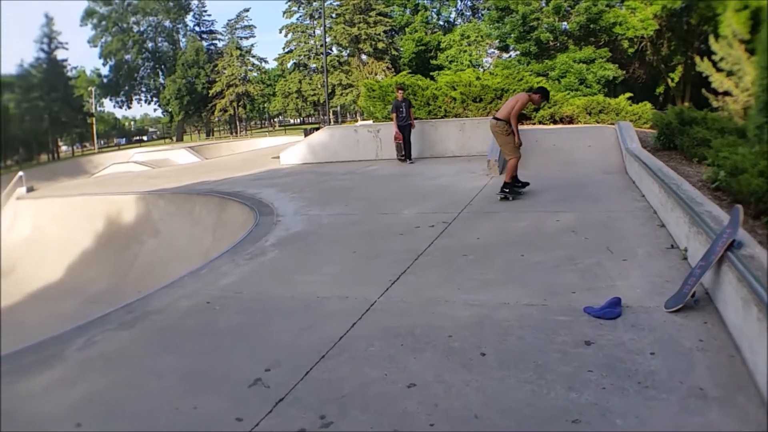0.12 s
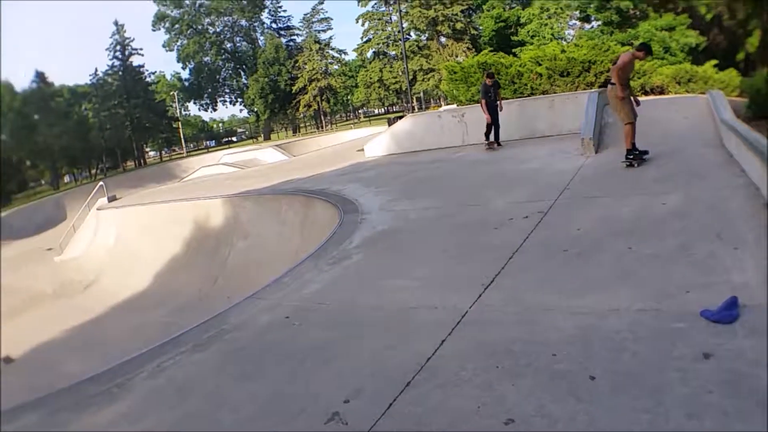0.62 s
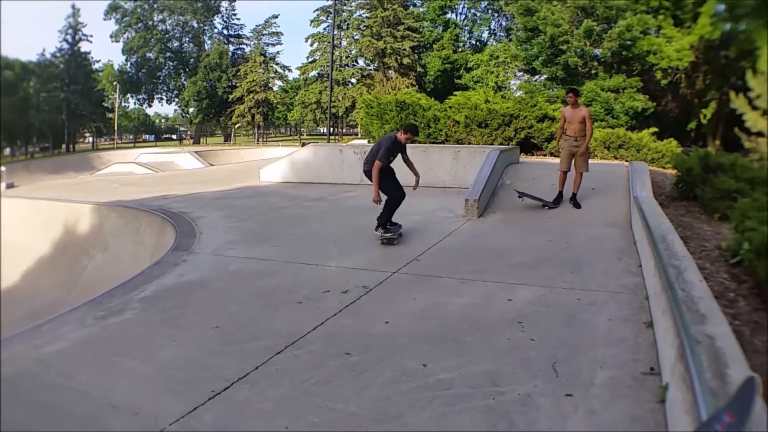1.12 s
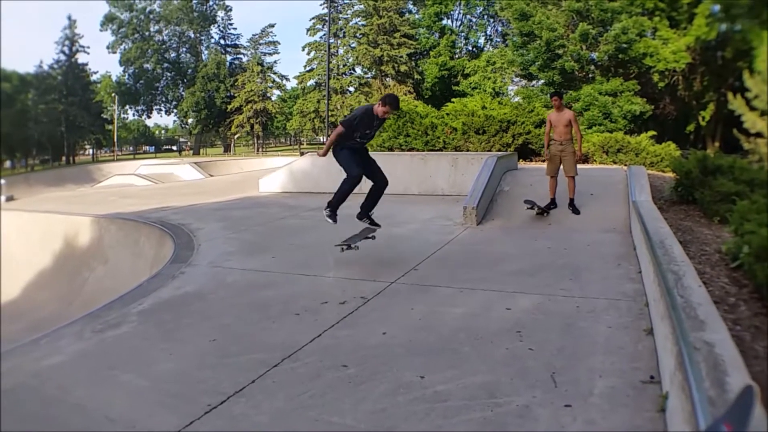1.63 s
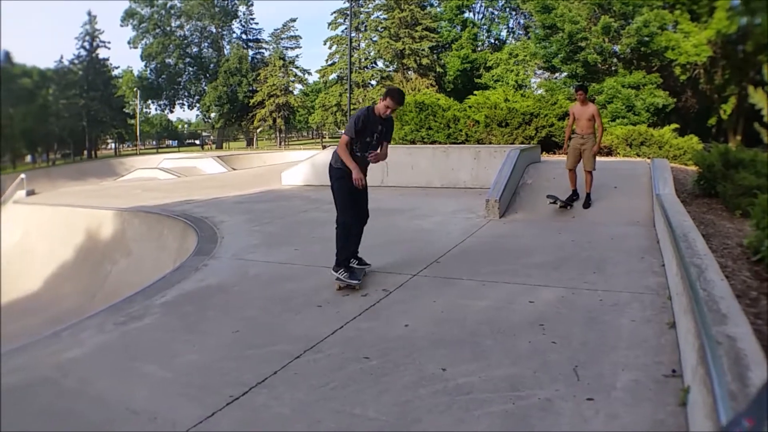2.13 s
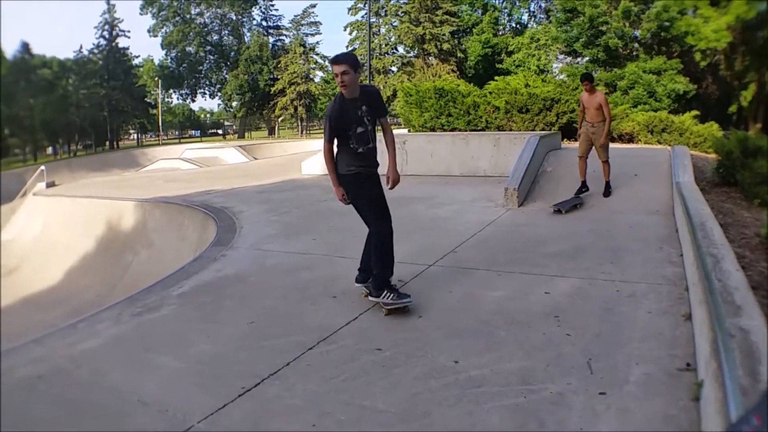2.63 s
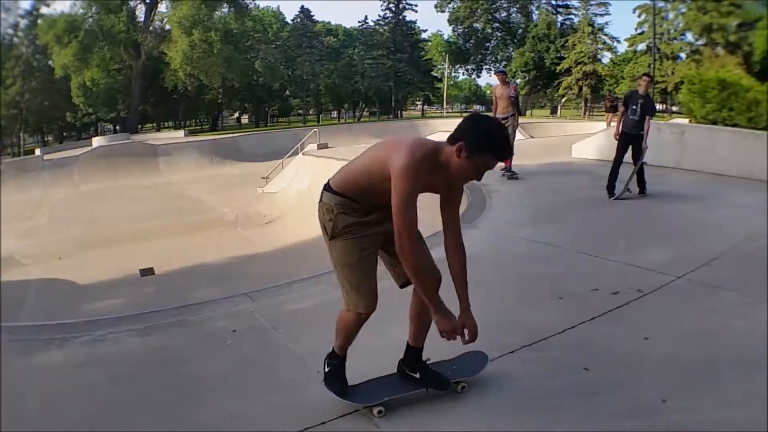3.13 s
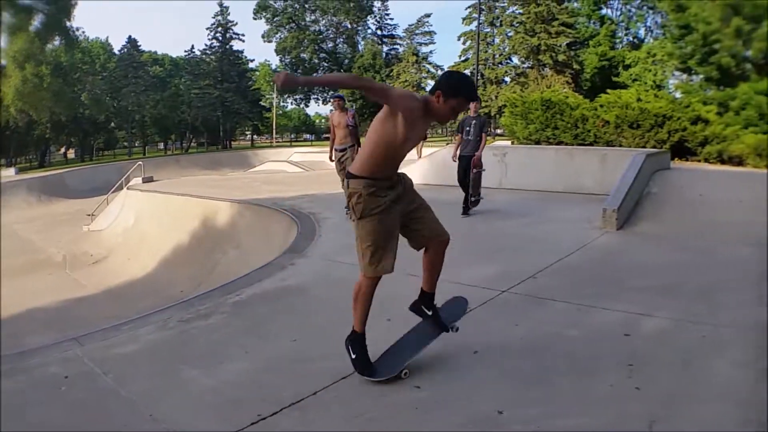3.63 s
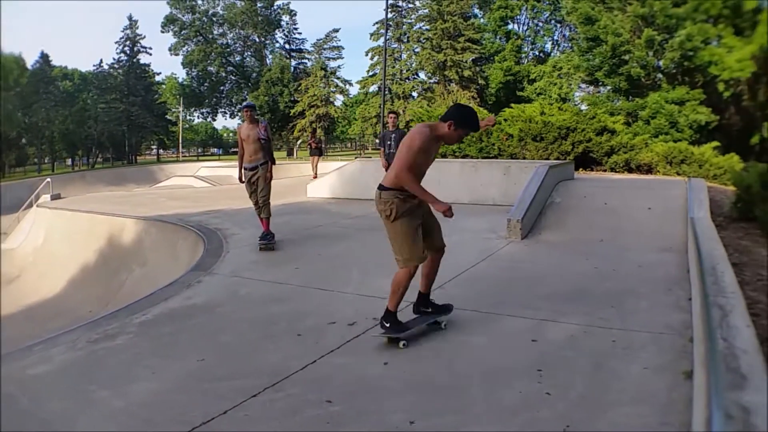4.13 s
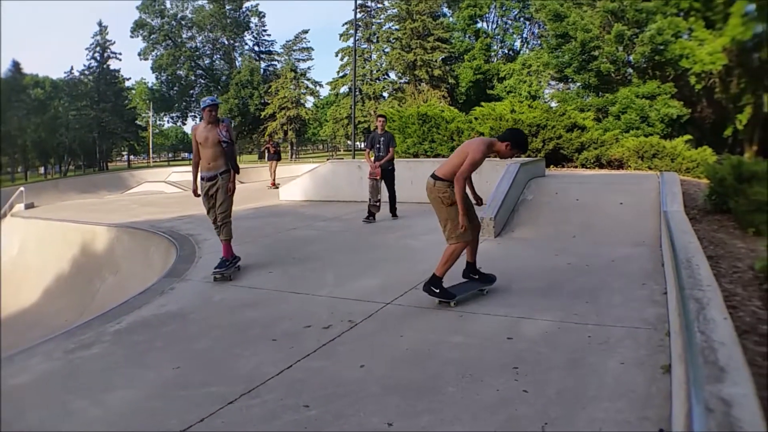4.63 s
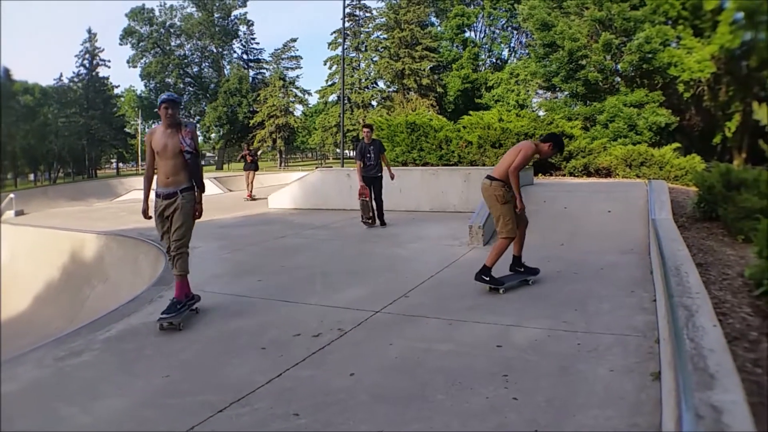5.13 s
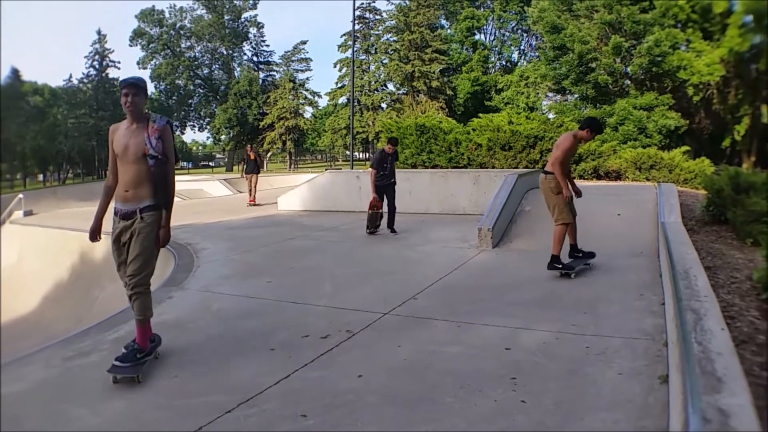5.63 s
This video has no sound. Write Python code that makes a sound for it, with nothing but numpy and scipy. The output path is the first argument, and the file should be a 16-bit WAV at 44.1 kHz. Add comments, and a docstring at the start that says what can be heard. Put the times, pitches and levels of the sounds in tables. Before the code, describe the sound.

Outdoors on skatepark concrete, wheels roll steadily with a soft low rumble, grainy grind and faint airy whirr near 4 kHz. Light ticks lead to a knock at 0.74 s, which is cut off by a hard click and a brief gap in near knocks; at 0.86 s a board falls flat with a dull thump on the right, farther away. Rolling continues, a pop snaps at 1.54 s, and the landing at 1.87-1.93 s is the loudest, driest wooden crack. Rolling thins; a tiny rising rubber squeal skids at 2.5 s, followed by small ticks and a rub. Around 3.05 s and 3.27 s a closer board thumps and clacks, with stronger deck drone and a hum near 100 Hz. It pops at 3.81 s with metallic truck ring, touches at 4.15 s and lands at 4.26-4.3 s in clustered rattling knocks. A few lighter knocks follow until 4.83 s, then quieter, wavering rolling and hum to the end.

```python
"""Skateboards on skatepark concrete

Skateboards roll over the concrete of an open skatepark; two flip tricks are popped, caught and landed.
Each blow is a set of struck modes (deck thump, wooden clack, truck ring) with bursts of treble noise and
a short rattle. Rolling, whirr, hiss, rubs and scrapes are coloured noise; wheel hum and skid squeal are sines.
Low walls echo the near sounds. The left microphone faces the riders; the right one is shadowed and duller."""
import sys
import numpy as np
from scipy import signal
from scipy.fft import rfft, irfft
from scipy.io import wavfile

SR = 44100
rng = np.random.default_rng(int(sys.argv[2]) if len(sys.argv) > 2 else 0)


def transcribe(u):
    """Save the signal u as a 16-bit wav file named by the first command-line argument.

    u: samples, shape (n,) or (channels, n), limited to [-1, 1]; the rate is SR.
    q: integer samples, one column per channel.
    """
    v = np.clip(np.atleast_2d(u).T, -1, 1)
    q = np.round(v * 32767).astype(np.int16)
    wavfile.write(sys.argv[1], SR, q)


def gain_from_db(level_db):
    """Convert decibel levels to linear amplitude factors (20 dB per decade)."""
    decades = np.asarray(level_db, float) / 20
    return 10 ** decades


N = 254456
T = np.arange(N) / SR
HZ = np.maximum(np.fft.rfftfreq(N, 1 / SR), 1)
CONTACT_S = 0.00045   # time a hard contact takes to build


def in_time(rows):
    """Columns of a curve, sample by sample."""
    s, *columns = np.transpose(rows)
    return [np.interp(T, s, c) for c in columns]


def at_hz(points):
    """A spectrum table read on the FFT grid, along log frequency."""
    hz, db = np.array(points).T
    return np.interp(np.log(HZ), np.log(hz), db)


def rms_one(x):
    """Scale to rms 1."""
    return x / np.sqrt(np.mean(x ** 2) + 1e-20)


def drift(rate):
    """Slow chance with a spread of about 1: `rate` new values a second, joined by straight lines."""
    steps = rng.standard_normal(int(N / SR * 200) + 2)
    return np.interp(T * np.clip(rate, 0.1, 190), np.arange(len(steps)), steps)


def grains(spread_db):
    """Dense grains of uneven size: noise whose level jumps every 32 samples."""
    size = np.minimum(rng.exponential(1, N // 32 + 1), 4).repeat(32)[:N]
    return rng.standard_normal(N) * gain_from_db(spread_db * size)


def wide(spectrum, grain_db, balance, likeness):
    """Grains coloured and spread over both sides; the middle has rms 1."""
    alike, tilt = np.clip(likeness, 0, 1), gain_from_db(balance / 2)
    near, other = rfft(grains(grain_db)), rfft(grains(grain_db))
    left = near * tilt
    right = (alike * near + np.sqrt(1 - alike ** 2) * other) / tilt
    middle_gain = np.sqrt(tilt ** 2 + tilt ** -2 + 2 * alike)
    pair = irfft(np.array([left, right]) * gain_from_db(at_hz(spectrum)) / middle_gain, N)
    return pair / np.sqrt(np.mean(pair.mean(0) ** 2))


def placed(x, balance, lead):
    """One source on both microphones, with its own level and delay on each, and dull echoes from the walls."""
    # wall echoes [delay t/s, left level/dB, right level/dB]
    walls = [(.009, -11, -15), (0.024, -20, -17), (.041, -28, -26.5), (.064, -41, -35.5),
             (0.096, -27, -36.5)]
    tilt = gain_from_db(balance)
    ears = np.array([2 * tilt + 0 * lead, 2 * np.exp(-1j * lead)]) / (1 + tilt)
    echoes = sum(gain_from_db([[left], [right]]) * np.exp(-2j * np.pi * HZ * s) for s, left, right in walls)
    dulling = 1 / (1 + 1j * HZ / 500)   # low-pass from 500 Hz
    return irfft(rfft(x) * ears * (1 + dulling * echoes), N)


def leaning(modes, centre_hz, focus_db):
    """Where the blow falls decides which modes speak up: weaker by focus_db per octave from the centre."""
    return [(hz, db - focus_db * abs(np.log2(hz / centre_hz)), t60) for hz, db, t60 in modes]


def ringing(modes, t, contact_s=CONTACT_S):
    """Decaying modes struck with fresh strengths and pitches; the contact takes a moment to build; peak 1."""
    x = 0
    for (hz, db, t60), (a, b) in zip(modes, rng.standard_normal((len(modes), 2))):
        decay = gain_from_db(db + 2.4 * a - 60 * t / t60)
        x = x + decay * np.sin(2 * np.pi * hz * (1 + 0.046 * b) * t) * np.sign(b)
    x = x * (1 - np.exp(-t / contact_s)) ** 2
    return x / np.abs(x).max()


def chatter(blow):
    """Loose trucks touch again right after a blow: five weaker, unevenly spaced repeats."""
    spacing_s, repeat_db = 0.0052, -17.5
    touches = np.zeros(2048)
    delay, size = rng.random((2, 5))
    late = np.minimum(-spacing_s * np.log(1 - delay) + 0.002, 0.04)
    touches[(late * SR).astype(int)] = gain_from_db(repeat_db - 4 * late / spacing_s) * (2 * size - 1)
    touches[0] = 1
    return signal.fftconvolve(blow, touches)[:len(blow)]


def rattle_strength(shake):
    """Loose parts take a moment to start shaking, then their energy dies away."""
    rattle_t60_s, rise_s = 0.17, 0.00033
    fade = gain_from_db(-120 / (rattle_t60_s * SR))   # energy dies twice as fast in dB
    rise = np.exp(-1 / (rise_s * SR))
    energy = signal.lfilter([1], [1, -fade], shake + 1e-18)
    return np.sqrt(signal.lfilter([1 - rise], [1, -rise], energy))


def knocks(blows, snap_db, cycles=7.9):
    """Each blow: deck thump, wooden clack, truck ring and a snap of treble; also the rattle's strength in time.

    The thump falls by 60 dB in the given number of cycles."""
    # wooden deck modes [f/Hz, level/dB, t60/s]
    clack_modes = [(589, 0, 0.031), (780, -8.5, 0.016), (935, -5, 0.035), (1170, 0.5, 0.021),
                   (1400, 4.5, 0.016), (1770, 6.5, 0.012), (2180, -13, 0.036)]
    # metal truck modes [f/Hz, level/dB, t60/s]
    truck_modes = [(2616, -1, 0.047), (3030, -11, 0.0061), (3620, 3, 0.014), (3853, -4, 0.027),
                   (4530, -20.5, 0.04), (5300, -21, 0.023), (7100, -26, 0.0087)]
    crack_db, crack_t60_s, snap_t60_s = -9, 0.036, 0.033
    out, shake, t = np.zeros(N + 8192), np.zeros(N), np.arange(8192) / SR
    treble = signal.butter(4, 9000, "high", fs=SR, output="sos")
    edge = signal.butter(4, [1700, 4700], "band", fs=SR, output="sos")
    wood = signal.butter(4, 2600, "low", fs=SR, output="sos")
    low_cut = signal.butter(2, 70, "high", fs=SR, output="sos")
    for s, db, clack_hz, thump_db, thump_hz, truck_db, truck_hz, rattle_db in blows:
        clack = ringing(leaning(clack_modes, clack_hz, focus_db=22), t)
        truck = ringing(leaning(truck_modes, truck_hz, focus_db=28.5), t)
        thump_t60 = cycles / thump_hz
        thump = ringing([(thump_hz, 0, thump_t60), (0.65 * thump_hz, -7, 0.9 * thump_t60),
                         (1.83 * thump_hz, -8, thump_t60 / 2)], t, contact_s=0.00043)
        # the first touch is broad and unpitched
        crack = signal.sosfilt(edge, rng.standard_normal(len(t))) * gain_from_db(crack_db - 60 * t / crack_t60_s)
        truck = truck + crack * (1 - np.exp(-t / CONTACT_S))
        snap = signal.sosfilt(treble, rng.standard_normal(len(t))) * gain_from_db(-60 * t / snap_t60_s)
        blow = signal.sosfilt(wood, chatter(clack) + gain_from_db(thump_db) * thump)
        blow = blow + gain_from_db(truck_db) * chatter(truck) + gain_from_db(snap_db) * snap
        i = round(s * SR)
        out[i:i + len(t)] += gain_from_db(db) * blow
        shake[i] = gain_from_db(db + rattle_db) ** 2
    return signal.sosfilt(low_cut, out[:N] + 1e-18), rattle_strength(shake)


def pitched(s, db, clack_hz, thump_db, truck_db):
    """A blow with the thump and truck pitches set for its stretch of time; more truck ring, more rattle."""
    # pitches by stretch of time [from t/s, thump f/Hz, truck f/Hz]
    stretches = [(0, 218, 2910), (1.2, 433, 3780), (2.95, 260, 2840), (3.6, 333, 2710), (4.0, 240, 3040)]
    _, thump_hz, truck_hz = [stretch for stretch in stretches if stretch[0] <= s][-1]
    return s, db, clack_hz, thump_db, thump_hz, truck_db, truck_hz, -3.5 + 0.47 * truck_db


def contacts(faint_count):
    """All blows, and ticks of wheels over joints and grit, with faint ticks at random."""
    # pops, catches, landings and other knocks, with some wheel ticks that ring the trucks
    # [t/s, clack level/dB, clack f/Hz, thump over clack level/dB, truck over clack level/dB]
    blow_rows = [(0.736, -23, 1970, 1.5, -19), (0.739, -18.5, 1115, -4.5, -16.5),
                 (1.536, -16.5, 1130, 4, -25), (1.614, -35.5, 1430, -3.5, -8), (1.808, -24, 1160, 2.5, -8),
                 (1.87, -6, 1604, -1.5, -24), (1.893, -23.5, 1170, 4.5, -24), (1.904, -10, 1223, -4.5, -19),
                 (1.928, -20.5, 1056, 3.5, -22), (3.021, -25, 1180, -16, -24),
                 (3.055, -20.5, 1055, 10, -15.5), (3.062, -26.5, 1520, 13, -22),
                 (3.072, -21.5, 1196, 3, -14), (3.082, -21, 1220, -12, -33.5), (3.129, -28, 1770, 0, -10),
                 (3.177, -41, 956, 9.5, -4), (3.264, -16.5, 830, 6.5, -27.5), (3.274, -15.5, 1820, -8, -27),
                 (3.278, -26.5, 1740, 15.5, -32.5), (3.289, -30.5, 1470, 13, -38),
                 (3.704, -30, 1160, -9.5, -13), (3.812, -16, 1380, 4, -1.5), (3.838, -24.5, 875, -11.5, -4),
                 (4.153, -21, 1430, 3.5, -12.5), (4.209, -23.5, 944, -21, -4),
                 (4.261, -13.5, 1280, -1.5, -12), (4.276, -14.5, 930, 3.5, -3.5),
                 (4.282, -18, 1009, 13, -3.5), (4.296, -17.5, 1170, 7, -48), (4.303, -26, 1496, 13, -50.5),
                 (4.485, -29, 1260, -0.5, -10.5), (4.651, -28, 940, -1.5, -15),
                 (4.738, -36, 1270, -3.5, -8), (4.831, -33, 930, 0, -14)]
    # wheel ticks [t/s, clack level/dB, clack f/Hz]
    tick_rows = [(0.036, -32, 890), (0.454, -38.5, 850), (0.626, -35, 840), (0.701, -40, 856),
                 (1.475, -33.5, 1260), (1.677, -34, 1570), (2.61, -42.5, 1370), (2.631, -35.5, 1120),
                 (2.659, -41.5, 1400), (2.669, -32.5, 1310), (2.691, -43.5, 1160), (2.701, -33.5, 960),
                 (2.832, -31, 1280), (2.863, -35, 1110), (5.693, -32, 1270)]
    tick_thump_db, tick_truck_db, tick_thump_hz = 1.5, -25, 200
    faint = [(when * N / SR, -47.5 + 6 * size, 850 + 500 * pitch)
             for when, size, pitch in rng.random((faint_count, 3))]
    ticks = [pitched(s, db, hz, tick_thump_db, tick_truck_db) for s, db, hz in list(tick_rows) + faint]
    ticks = [row[:4] + (tick_thump_hz,) + row[5:] for row in ticks]
    return [pitched(*row) for row in blow_rows] + ticks


def struck_boards(rattle, shadow, lead):
    """Blows, ticks and rattle on the near side, and a board that falls flat on the right."""
    # the fallen board [f/Hz, left over right level/dB]
    drop_side = [(60, -21), (240, -4.5), (950, -23.5), (3770, 20), (15000, 9)]
    mute_s, drop_s = 0.7442, 0.859
    blows, shake = knocks(contacts(faint_count=8), snap_db=-38.5)
    near = placed(blows, shadow, lead) + shake * rattle
    # near blows and rattle stop dead with a hard click and are muted until the drop
    near[:, (T > mute_s) & (T < drop_s)] = 0
    near[:, round(mute_s * SR)] = gain_from_db(-30) * np.array([1.6, 0.4])
    # time, clack dB and Hz, thump dB and Hz, truck dB and Hz, rattle dB
    fall = (drop_s, -13, 1090, 9, 289.4, -12.5, 3650, -30)
    # farther off, so without bright snap; its thump rings 1.05 times longer
    drop, drop_shake = knocks([fall], snap_db=-64.5, cycles=1.05 * 7.9)
    right_first = -2 * np.pi * HZ * 0.00036   # reaches the right microphone 0.36 ms earlier
    return near + placed(drop, at_hz(drop_side), right_first) + drop_shake * rattle


def skid(shadow):
    """Wheels skid sideways: rubber sticks and slips in a rising squeal with an overtone, over a scrape."""
    # course of the skid [t/s, squeal f/Hz, squeal level/dB, scrape level/dB]
    course = [(2.455, 250, -65, -68), (2.47, 270, -58, -55), (2.498, 300, -44, -47), (2.51, 335, -35, -44),
              (2.52, 365, -30, -46), (2.533, 390, -33, -53), (2.543, 395, -65, -68)]
    # colour of the scrape [f/Hz, level per Hz/dB]
    scrape_colour = [(88, -50), (150, -12), (310, -10), (1200, 5), (2750, -16), (3900, -6.5), (5560, -22.5),
                     (7500, -41), (11000, -25), (15300, -23), (16400, -47)]
    hz, squeal_db, scrape_db = in_time(course)
    turn = 2 * np.pi * np.cumsum(hz * (1 + 0.013 * drift(80.0))) / SR
    on = (T > course[0][0]) & (T < course[-1][0])
    squeal = np.sqrt(2) * gain_from_db(squeal_db) * (np.sin(turn) + 0.028 * np.sin(2 * turn))
    scrape = gain_from_db(scrape_db) * wide(scrape_colour, 2.0, shadow, 0.55)
    return squeal * on, scrape * on


def noise_bands():
    """Brief swelling bands of noise: rubs and scrapes, crunch within landings, a second squeal tone in the skid."""
    # bands [t/s, length t/s, centre f/Hz, width f/Hz, level/dB]
    band_rows = [(0.642, 0.059, 850, 200, -47.5), (0.86, 0.078, 2800, 1120, -48),
                 (0.864, 0.045, 1066, 250, -39), (1.548, 0.12, 1530, 700, -46.5),
                 (1.815, 0.032, 1280, 395, -53), (1.872, 0.17, 1280, 1190, -53),
                 (2.49, 0.033, 572, 50.3, -34.5), (2.771, 0.075, 2370, 700, -56),
                 (2.84, 0.36, 1240, 660, -46), (3.045, 0.13, 2760, 450, -52),
                 (3.05, 0.1, 4000, 1600, -61.5), (3.048, 0.065, 520, 294, -28),
                 (3.689, 0.049, 1900, 1480, -45), (3.817, 0.14, 1510, 1580, -38),
                 (3.803, 0.08, 3270, 1710, -47), (4.252, 0.052, 1590, 1780, -37),
                 (4.258, 0.044, 460, 93, -21.5), (4.603, 0.046, 2250, 700, -52)]
    out = np.zeros(N)
    for s, length, hz, width_hz, db in band_rows:
        band = signal.butter(3, [hz - width_hz / 2, hz + width_hz / 2], "band", fs=SR, output="sos")
        swell = np.sin(np.pi * np.clip((T - s) / length, 0, 1) ** 0.81) ** 1.6   # rises faster than it fades
        out += gain_from_db(db) * swell * rms_one(signal.sosfilt(band, grains(3.2)))
    return out


def rolling_and_air():
    """Wheels on rough concrete shake the deck, under a whirr near 4 kHz, perhaps insects, and a treble hiss."""
    # levels of the layers [t/s, rumble level/dB, deck drone level/dB, grind level/dB, whirr level/dB]
    levels = [(0.0, -39.5, -44, -55, -68), (0.45, -42, -46, -59, -70), (0.79, -41.5, -41.5, -51, -65.5),
              (1.08, -40, -41, -53, -68.5), (1.56, -38, -43.5, -52.5, -64.5), (1.86, -41, -44, -54.5, -65),
              (2.04, -39.5, -44, -48, -63), (2.17, -47.5, -49, -56.5, -73), (2.41, -43, -47, -58, -76),
              (2.73, -46, -48, -56, -74), (3.12, -33.5, -44, -46, -62), (3.25, -36.5, -38.5, -47, -62.5),
              (3.46, -35.5, -34, -49, -66.5), (3.89, -36.5, -45.5, -48, -64),
              (4.16, -34, -47.5, -48.5, -64.5), (4.32, -38.5, -51, -44.5, -67.5),
              (4.45, -40, -45.5, -47.5, -67), (4.81, -43.5, -53.5, -59, -78),
              (5.11, -42.5, -46.5, -57.5, -76.5), (5.77, -40, -45, -52, -65.5)]
    # colours of the layers, the deck for the first and second ride [f/Hz, level per Hz/dB]
    rumble_colour, grind_colour = [(18, -46), (30, -14.5), (48, -7.5), (70, -5), (97, -4), (129, -1),
                                   (162, -1.5), (180, -13.5), (230, -41.5), (400, -120)], [(290, -28), (500, -2), (626, -8.5), (680, -10),
                                                   (744, -8.5), (911, -9), (1000, -8), (1100, -8.5),
                                                   (1830, -17.5), (2080, -23), (3000, -31), (3900, -67.5),
                                                   (6600, -120)]
    deck_1_colour, deck_2_colour = [(100, -26), (170, -7.5), (183, -11.5), (221, -3), (323, -19),
                                    (339, -21.5), (361, -19.5), (392, -21), (430, -25.5), (540, -44),
                                    (700, -58), (1190, -120)], [(100, -32.5), (170, -5.5), (210, 3), (280, 1),
                                                    (317, 0.5), (372, -2), (404, -0.5), (481, -11.5),
                                                    (540, -10), (700, -36), (1190, -120)]
    whirr_colour, hiss_colour = [(1590, -53.5), (2700, -30), (3420, -11), (3720, 0), (3990, 0.5),
                                 (4230, -2.5), (5550, -28), (6500, -36), (8450, -63), (14300, -120)], [(3820, -43.5), (6500, -5.5), (7710, -17), (10400, -5),
                                                (15200, 3), (16100, -0.5), (16400, -22.5)]
    # balance of these layers [f/Hz, left over right level/dB]
    balance = [(60, 5.5), (110, 1.5), (200, 5), (380, 7), (700, 8.5), (1290, 12.5), (2380, 8), (4400, 12.5),
               (8120, -0.5), (15000, 3)]
    # left-right likeness of these layers [f/Hz, likeness 0 to 1]
    likeness = [(60, 0.87), (130, 0.89), (290, 0.77), (640, 0.34), (1410, 0.02), (3100, 0.05), (6820, 0.05),
                (15000, 0.05)]
    second_ride_s = 2.95
    rumble_db, deck_db, grind_db, whirr_db = in_time(levels)
    hiss_db = -81 + 1.15 * (whirr_db + 66.5)   # the treble hiss follows the whirr's swing
    spread, alike = at_hz(balance), at_hz(likeness)
    flicker = drift(14.0)   # shared by deck, grind and whirr
    rumble = gain_from_db(rumble_db + 2.3 * drift(30.0)) * wide(rumble_colour, 1.3, spread, alike)
    first, second = wide(deck_1_colour, 2.7, spread, alike), wide(deck_2_colour, 3.8, spread, alike)
    over = np.pi / 2 * np.clip((T - second_ride_s) / 0.05, 0, 1)   # 50 ms crossfade
    deck = np.cos(over) * first + np.sin(over) * second
    deck = gain_from_db(deck_db + 0.37 * flicker + 1.0 * drift(2.2)) * deck
    grind = gain_from_db(grind_db + 2.3 * flicker + 0.88 * drift(40.0)) * wide(grind_colour, 1.0, spread, alike)
    whirr = gain_from_db(whirr_db + 0.8 * flicker + 0.78 * drift(62.0)) * wide(whirr_colour, 1.5, spread, alike)
    hiss = gain_from_db(hiss_db + 0.8 * drift(30.0)) * wide(hiss_colour, 1.5, spread, alike)
    return rumble + deck + grind + whirr + hiss


def wheel_hum():
    """Wheels out of round hum in lines on the turning rate, each wavering on its own."""
    # strength of the hum [t/s, level/dB]
    hum = [(3.1, -35.5), (4.15, -34), (4.3, -47), (4.41, -38.5), (4.82, -47.5), (5.29, -46), (5.34, -35),
           (5.5, -49.5), (5.54, -40.5), (5.77, -40.5)]
    # lines of the hum [multiple of the base pitch, level/dB]
    orders = [(.5, -21), (1, -1), (1.5, -20), (2, -13), (3, -19)]
    start_s = hum[0][0]
    db, = in_time(hum)
    hz = 98.5 + 1.7 * (T - start_s)   # twice the turning rate, rising 1.7 Hz a second
    turn = 2 * np.pi * np.cumsum(hz) / SR
    lines = sum(gain_from_db(order_db + 2.0 * drift(9.8)) * np.sin(k * turn + rng.uniform(0, 2 * np.pi))
                for k, order_db in orders)
    fade_in = np.clip((T - start_s) / 0.12 + 1, 0, 1)
    return np.sqrt(2) * gain_from_db(db) * lines * fade_in


def faint_tones():
    """Steady hums: noise in narrow resonances."""
    # hums [f/Hz, width f/Hz, level/dB]
    hums = [(130.5, 29, -52.5), (208.2, 9, -58.5), (616, 17, -64), (853, 12, -67.5)]
    out = 0
    for hz, width_hz, db in hums:
        resonance = 1 / (1 + (2 * (HZ - hz) / width_hz) ** 2)
        out = out + gain_from_db(db) * rms_one(irfft(rfft(rng.standard_normal(N)) * resonance, N))
    return out


def scene():
    """Blows with their rattle, skid, noise bands, rolling with whirr and hiss, and hums."""
    # near sounds [f/Hz, left over right level/dB]
    shadow_curve = [(60, 2.5), (110, 9.5), (200, 1.5), (380, 12.5), (700, 6), (1290, 12), (2380, 15),
                    (4400, 15.5), (8120, 23.5), (15000, 27)]
    # near sounds [f/Hz, phase by which the left leads/rad]
    lead_curve = [(0, 0.53), (1000, 1.2), (1640, 0.99), (1900, 3.5), (2600, 2), (3800, 1), (8000, 0.5)]
    # colour of the rattle [f/Hz, level per Hz/dB]
    rattle_colour = [(88, -40.5), (150, 2), (310, 3), (700, -7.5), (1200, -3.5), (1750, -8), (2200, -13),
                     (2750, -24.5), (3200, -26), (3700, -26), (4600, -31), (5200, -49), (7500, -58),
                     (10500, -42.5), (15200, -40.5), (16400, -55)]
    shadow, lead = at_hz(shadow_curve), np.interp(HZ, *np.transpose(lead_curve))
    struck = struck_boards(wide(rattle_colour, 1.74, shadow, 0.78), shadow, lead)
    squeal, scrape = skid(shadow)
    near = placed(squeal + noise_bands() + faint_tones(), shadow, lead)
    hum = gain_from_db([[1.5], [-1.5]]) * wheel_hum()   # 3 dB stronger on the left
    return struck + near + scrape + rolling_and_air() + hum


def top_cut(x):
    """Nothing passes above the cut-off."""
    return signal.sosfilt(signal.butter(12, 16960, fs=SR, output="sos"), x)


def record(dry):
    """Peaks are rounded by soft saturation."""
    mix = 1.33 * np.tanh(dry / 1.295)
    return top_cut(mix)


dry = scene()
out = record(dry)
transcribe(out)
```